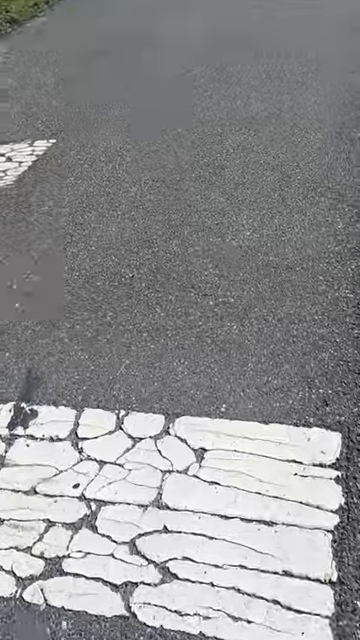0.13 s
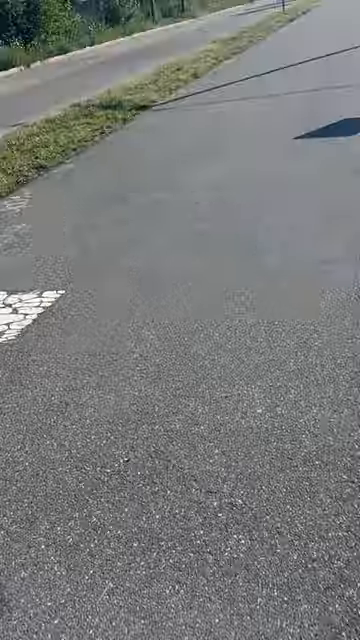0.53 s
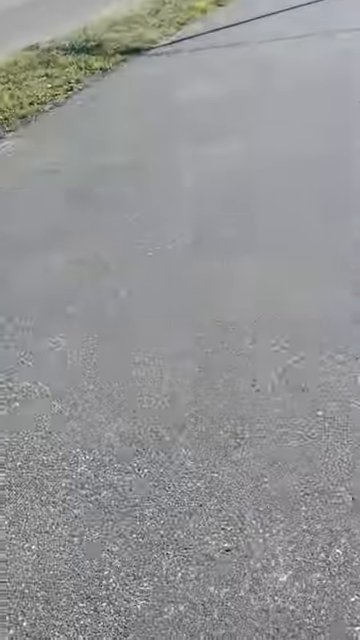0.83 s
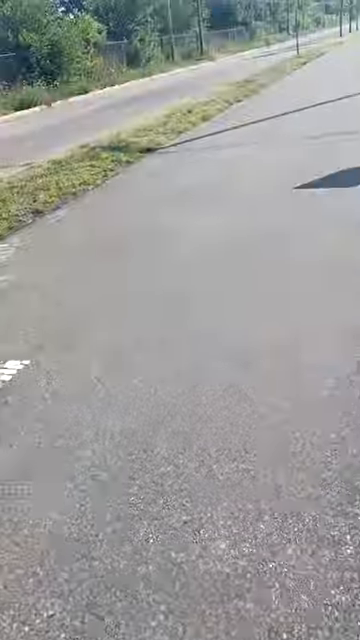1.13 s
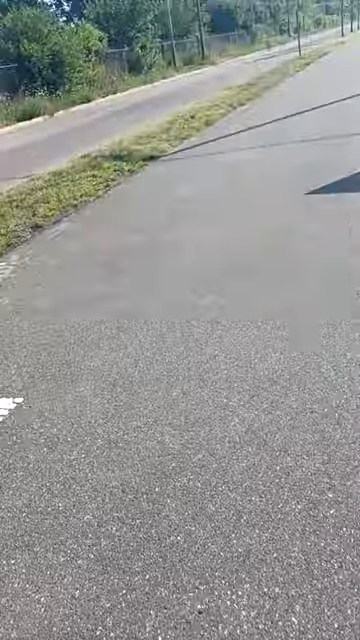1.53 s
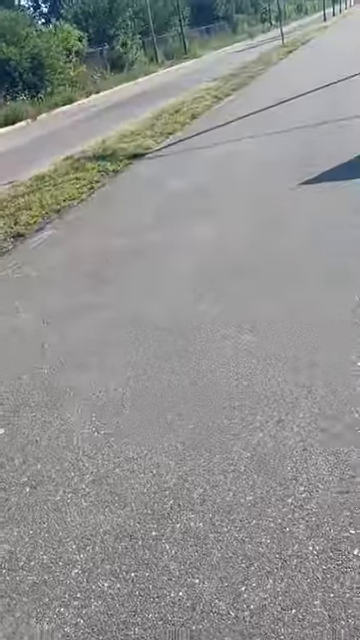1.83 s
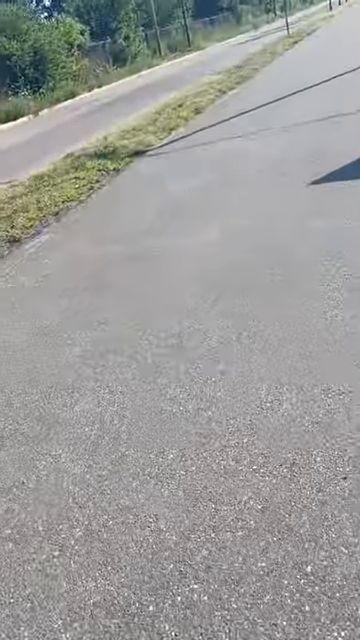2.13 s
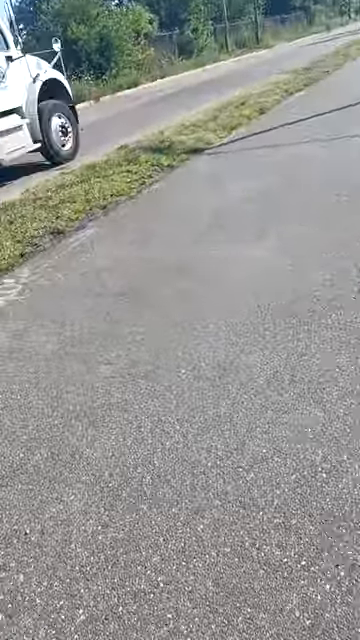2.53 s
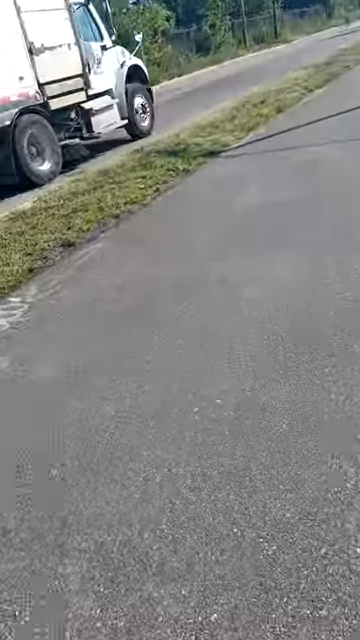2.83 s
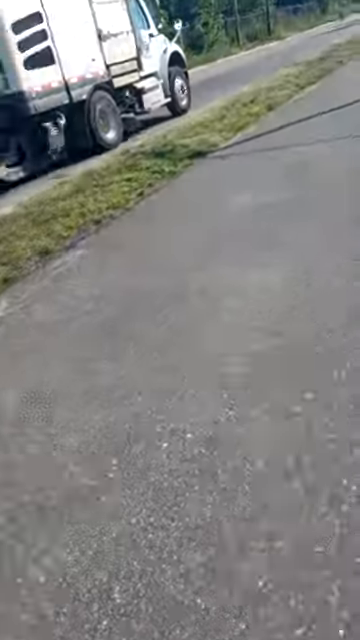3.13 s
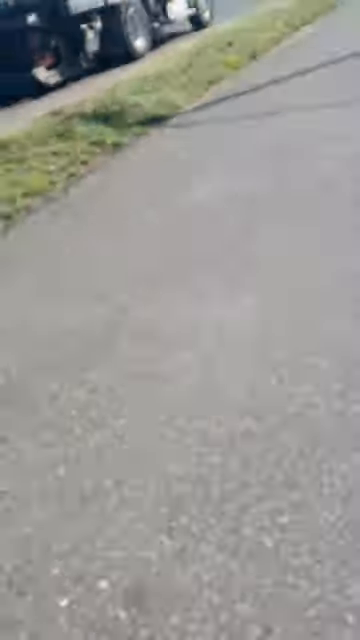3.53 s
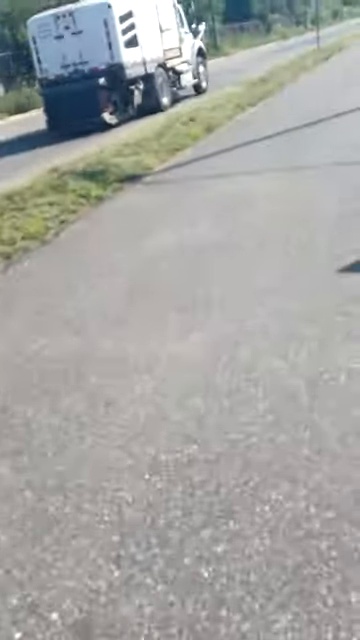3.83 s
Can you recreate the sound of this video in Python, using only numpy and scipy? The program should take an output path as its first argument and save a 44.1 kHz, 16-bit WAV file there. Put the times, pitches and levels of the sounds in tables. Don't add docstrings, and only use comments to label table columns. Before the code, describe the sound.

Loud truck engine growl and broad fan and tyre roar pass from slightly left to right outdoors, with a breathy turbo whine, a knock at three seconds, a faint air puff and a quieter rumbling tail.

```python
import sys
import numpy as np
from scipy import signal
from scipy.fft import rfft, irfft
from scipy.io import wavfile

SR = 44100
rng = np.random.default_rng(int(sys.argv[2]) if len(sys.argv) > 2 else 0)


def field_ratio(decibels):
    return 10 ** (np.asarray(decibels, dtype=float) / 20)


def to_wav(sig):
    pcm = np.clip(np.atleast_2d(sig), -1, 1) * 32767
    pcm = np.round(pcm).astype(np.int16)
    wavfile.write(sys.argv[1], SR, pcm.T)


N = 175959
T = np.arange(N) / SR

# (time [s], roar level [dB], left-right balance [dB], brightness [0-1])
PASS = [(0.2, -23, 1.5, 1), (0.66, -22.5, 1.5, 0.96), (1.84, -21.5, -4.5, 0.44), (1.9, -21.5, -6, 0.82),
        (2.48, -24, -8, 0.61), (2.51, -25.5, -6.5, 0.91), (2.55, -24.5, -8.5, 1), (2.59, -27, -10, 1),
        (2.71, -24.5, -4.5, 0.28), (3.25, -29.5, -7.0, 0.89), (3.9, -31, -4, 1)]


def rms_one(x):
    return x / np.sqrt(np.mean(x ** 2) + 1e-20)


def in_time(rows):
    s, *columns = np.transpose(rows)
    return [np.interp(T, s, column) for column in columns]


def at_hz(points, hz):
    table_hz, value = np.array(points).T
    return np.interp(np.log(hz), np.log(table_hz), value)


def drift(rate_hz):
    hop, settle = 40, 2000
    r = np.exp(-2 * np.pi * hop * rate_hz / SR)
    white = rng.standard_normal(N // hop + settle + 2)
    slow = signal.lfilter([1], [1, -2 * r, r * r], white)[settle:]
    return np.interp(np.arange(N) / hop, np.arange(len(slow)), rms_one(slow))


def swell(at_s, lasts_s):
    return np.exp(-.5 * ((T - at_s) / lasts_s) ** 2)


def bell(x, width):
    return np.exp(-.5 * (x / width) ** 2)


def coloured(x, gain):
    hz = np.maximum(np.fft.rfftfreq(N, 1 / SR), 1)
    return irfft(rfft(x) * gain(hz), N)


def band_pass(x, band_hz):
    return signal.sosfilt(signal.butter(2, band_hz, "band", fs=SR, output="sos"), x)


def ports(shared, own, hz, view):
    # (frequency [Hz], left-right likeness [0-1])
    likeness = [(30, .85), (70, 1), (300, .99), (700, 0.95), (1200, 0.9), (2000, 0.72), (4500, 0.25),
                (12000, .1)]
    # (frequency [Hz], share of the balance [ratio])
    shadow = [(150, 0.12), (300, -0.082), (700, 1.1), (2200, 1.23), (4500, 1.12), (8000, 0.72),
              (13000, -0.25)]
    bass_lag, lag, balance_db = view
    alike = np.clip(at_hz(likeness, hz), 0, 1)
    n = np.arange(N)
    if hz < 400:
        late = np.interp(n - bass_lag, n, shared)
    else:
        late = shared[np.clip(n - np.round(lag).astype(int), 0, N - 1)]
    gain = field_ratio(balance_db * at_hz(shadow, hz) / 2)
    left = np.sqrt(alike) * late + np.sqrt(1 - alike) * own[0]
    right = np.sqrt(alike) * shared + np.sqrt(1 - alike) * own[1]
    return np.array([left * gain, right / gain])


def roar(cycle, view, patchy_db):
    # (time [s], turn [0 front, 1 flank, 2 rear])
    turn_rows = [
        (.15, 0.35),
        (.9, 0.21),
        (1.5, 0.62),
        (2.3, 1.15),
        (2.9, 1.6),
        (3.9, 1.63),
    ]
    # (frequency [Hz], level [dB per Hz])
    front = [(50, -27), (85, -9.5), (250, -12.5), (600, 0), (1100, -11.5), (2300, -12.5), (4700, -26),
             (13500, -37)]
    flank = [(50, -40), (85, -4.5), (230, 0), (600, -9), (1100, -13.5), (1900, -14), (4700, -26.5),
             (13500, -36.5)]
    rear = [(50, -27), (100, -6), (230, -1.5), (600, -7), (1100, -10.5), (2100, -20.5), (4300, -35),
            (13500, -45.5)]
    side_db = [0.2, -1.53, 3]
    # (frequency [Hz], width [octaves], change [dB], time [s],
    # lasts [s])
    band_changes = [(505, 0.15, -5, 0.5, 0.35), (1350, 0.23, -6, 0.93, 0.11), (3400, .3, -4, 1.2, .22),
                    (2150, .3, 3.5, 1.3, .17), (2000, .4, -2.5, 1.7, .1), (88, .2, -4, .9, .9),
                    (570, .2, -3, .7, .2), (3520, 0.35, 2.5, 1.67, 0.17), (288.5, 0.2, 5.5, 2.21, 0.053),
                    (362, .25, 4, 2.38, 0.075), (189, 0.18, -5, 2.33, 0.17), (520, 0.21, -1.5, 2.18, .15),
                    (3860, 0.34, 3.5, 3.68, 0.15), (2920, 0.12, 0, 3.5, 0.25), (65, 0.28, 2.5, 1, 0.79),
                    (67, 0.48, 5, 3.75, 0.43), (246.1, 0.16, 6, 1.0, 0.2), (225, 0.22, 1, 2.04, 0.039),
                    (760, 0.28, 3, 1.62, 0.12), (1560, 0.14, 4, 1.82, 0.26), (396, 0.24, 1, 0.23, 0.11),
                    (330, 0.25, -1.5, 1.1, .35), (2473, 0.08, 0, 1.2, 0.089)]
    clatter_depth, clatter_from_hz = 0.12, 1200

    level_db, _, brightness = in_time(PASS)
    turn = np.clip(in_time(turn_rows)[0], 0, 2)
    together = drift(4.0)
    edges_hz = 32 * 2 ** np.arange(0, 9.1, 1 / 3)
    white = rng.standard_normal((2, 3, N))
    changes = [(mid_hz, width, db * swell(s, lasts)) for mid_hz, width, db, s, lasts in band_changes]
    clatter = 1 + clatter_depth * np.cos(6 * cycle + 4.5 * drift(8.4)) * field_ratio(1.3 * drift(4.2))
    out = 0
    for k, (low, high) in enumerate(zip(edges_hz, edges_hz[1:])):
        shared, *own = band_pass(white[k % 2], [low, high])
        hz = np.sqrt(low * high)
        heard_db = [at_hz(side, hz) + trim_db for side, trim_db in zip((front, flank, rear), side_db)]
        db = np.interp(turn, [0, 1, 2], heard_db)
        db = db + patchy_db * (.5 * together + .5 * drift(2.5) + .9 * drift(14.0))
        db = db + brightness * np.log2(hz / 500) * 0.28
        for mid_hz, width, change_db in changes:
            if .5 < hz / mid_hz < 2:
                db = db + bell(np.log2(hz / mid_hz), width) * change_db
        beat = clatter if hz > clatter_from_hz else 1
        out = out + field_ratio(db) * ports(shared, own, hz, view) * beat
    return field_ratio(level_db + 2.0) * rms_one(out)


def engine(cycle, view):
    # (multiple of the cycle [ratio], level [dB], loudest at [s], lasts [s])
    orders_heard = [(6, -32, 0.5, 0.5), (6, -33, 1.6, 0.42), (38, -32, .58, .22), (36, -35, 1.1, .12),
                    (8, -36.5, .5, 1), (9, -40, 0.31, 0.68), (9, -28.5, 1.12, 0.18), (9, -35, 1.9, 0.23),
                    (12, -34, .4, .5), (12, -34, 1.4, .6), (14, -29, 1.55, .18), (16, -31, 1.6, .07),
                    (14, -33, 1.95, .15), (14, -37, .75, .2), (17, -34, 1.15, .3), (17, -34, 1.9, .25),
                    (18, -36, .3, .3), (18, -29, 2.34, .1), (21, -30.5, .75, .2), (24, -33, .2, .12),
                    (24, -30, .54, .14), (22, -30, 2.2, .05), (25, -32, 2.36, .07), (18, -33, 1.08, .1),
                    (32, -33, 1.1, .07), (38, -34, 1.08, .08), (28, -32, 2.0, .06), (12, -32.5, 3.68, 0.22),
                    (9, -31, 3.97, 0.089), (18, -36.5, 4.27, .3), (10, -39, 3.28, 0.59),
                    (30, -38, 2.32, 0.057), (21, -34, 3.02, 0.23), (42, -30, 1.04, 0.084)]
    wobble_db, wobble_rad = 1.2, .3
    tone = 0
    for order in sorted({round(row[0]) for row in orders_heard}):
        heard = sum(field_ratio(db + 1.5) * swell(s, lasts)
                    for multiple, db, s, lasts in orders_heard if round(multiple) == order)
        level = heard * field_ratio(wobble_db * drift(4.3))
        phase = order * cycle + wobble_rad * drift(3.4) + rng.uniform(0, 2 * np.pi)
        tone = tone + level * np.sin(phase)
    return ports(tone, [tone, tone], 200, view)


def narrow(hz, width_hz):
    r = np.exp(-np.pi * width_hz / SR)
    stage = [1, 0, -1, 1, -2 * r * np.cos(2 * np.pi * hz / SR), r * r]
    return rms_one(signal.sosfilt([stage, stage], rng.standard_normal((3, N))))


def panels(view):
    # (frequency [Hz], width [Hz], level [dB], time [s], lasts [s])
    panel_rows = [(614, 49, -45, 0.37, .3), (811, 29, -33, 0.72, 0.38), (625, 30, -35, 2.4, 0.61),
                  (766, 63, -31, 1.66, 0.091), (427, 43, -38.5, 2.35, 0.47), (1153, 140, -34.5, 2.27, 0.36),
                  (1058, 33, -40, 3.27, 0.46), (2250, 510, -28.5, 0.51, 0.15),
                  (1750, 536, -35.5, 2.03, 0.34), (3800, 1800, -42, 3.315, 0.12),
                  (13200, 450, -57.5, 3.376, 0.45), (2230, 380, -35, 1.25, 0.088),
                  (1090, 89, -31.5, 0.49, 0.28)]
    out = 0
    for hz, width_hz, db, s, lasts in panel_rows:
        shared, *own = narrow(hz, width_hz) * field_ratio(db) * swell(s, lasts)
        out = out + ports(shared, own, hz, view)
    return out


def slow_noise(width_hz):
    white = rng.standard_normal((2, 3, N))
    return rms_one(signal.lfilter(*signal.butter(2, width_hz / 2, fs=SR), white))


def turbo(view):
    # (time [s], frequency [Hz], level [dB], breathiness [0-1])
    whine = [(.15, 4800, -44, .9), (.5, 4780, -43.5, .9), (1.32, 4780, -42, .9), (1.45, 4560, -43.5, .9),
             (1.9, 4560, -43, .8), (2.15, 4420, -46, .6), (2.3, 4385, -43.5, .3), (2.52, 4345, -43.5, .25),
             (2.555, 4345, -54, .25), (2.59, 4345, -43.5, .25), (2.7, 4335, -46.5, .3),
             (2.77, 4325, -66, .3)]
    width_hz, core_hz, throb_db = 360, 75, 2.8
    whistle_hz, whistle_db, whistle_s, whistle_lasts_s = 8164, -54, 2.02, .13

    hz, db, breath = in_time(whine)
    breath = np.clip(breath, 0, 1)
    carrier = np.exp(2j * np.pi * np.cumsum(hz) / SR)
    wide, core = slow_noise(width_hz), slow_noise(core_hz)
    slow = np.sqrt(breath) * wide + np.sqrt(1 - breath) * core
    hiss = slow[0] * carrier.real + slow[1] * carrier.imag
    hiss = hiss * field_ratio(db + throb_db * breath * drift(9.3))
    whistle = np.sin(2 * np.pi * whistle_hz * T + .6 * drift(15.0))
    whistle = whistle * field_ratio(whistle_db) * swell(whistle_s, whistle_lasts_s)
    return ports(hiss[0], hiss[1:], 3900, view) + whistle


def knocks(view):
    # (time [s], dull level [dB], clack level [dB], bright level [dB])
    knock_rows = [
        (3.0255, -8.5, -38, -44),
        (3.034, -11.5, -30, -45),
        (3.056, -27, -45, -33),
        (3.066, -30, -45, -38),
        (3.293, -32, -44, -36),
        (3.632, -19, -41, -45),
    ]
    # (frequency [Hz], level [dB], T60 [s])
    dull_modes = [(840, -5, .04), (1030, -1, .045), (1190, 0, .04), (1460, -1, .035), (600, -9, .04)]
    attack_s, bright_t60_s = .002, .06
    bump_s, bump_db, bump_hz, bump_lasts_s = 3.958, -18, 165, .003

    dull = np.zeros(N)
    rattle = np.zeros((2, 1, N))
    chance_db = rng.normal(0, 1.9, (len(knock_rows), len(dull_modes)))
    for row_db, (s, dull_db, *sharp_db) in zip(chance_db, knock_rows):
        age = np.maximum(T - s, 0)
        on = (T > s) * np.minimum(age / attack_s, 1)
        rattle += on * field_ratio(np.reshape(sharp_db, (2, 1, 1)) - 60 * age / bright_t60_s)
        for vary_db, (hz, db, t60) in zip(row_db, dull_modes):
            decay = field_ratio(dull_db + db + vary_db - 9 - 60 * age / t60)
            dull += on * decay * np.sin(2 * np.pi * hz * age)
    thud = np.cos(2 * np.pi * bump_hz * (T - bump_s))
    dull -= field_ratio(bump_db) * swell(bump_s, bump_lasts_s) * thud

    white = rng.standard_normal((3, N))
    clack = rattle[0] * rms_one(band_pass(white, (1400, 3500)))
    bright = rattle[1] * rms_one(band_pass(white, (3500, 6000)))
    out = ports(dull, [dull, dull], 409.9, view)
    out = out + ports(clack[0], clack[1:], 1500, view)
    return out + ports(bright[0], bright[1:], 3600, view)


def puff():
    # (frequency [Hz], level [dB per Hz])
    puff_colour = [(2500, -8), (4200, -2), (6000, -6), (9000, -4), (13000, 0), (15500, -3)]
    at_s, lasts_s, level_db, low_hz, pan_db = 3.262, .03, -46, 2500, -12
    white = rng.standard_normal((2, N))
    air = rms_one(coloured(white, lambda hz: field_ratio(at_hz(puff_colour, hz)) * (hz > low_hz)))
    return air * field_ratio(level_db + pan_db * np.array([[.5], [-.5]])) * swell(at_s, lasts_s)


def scene():
    # (time [s], firing rate [Hz])
    firing = [(.15, 85.2), (.6, 89.87), (.8, 88.77), (1.1, 82.84), (1.6, 89.1), (1.95, 88.07), (2.2, 79.93),
              (2.45, 76.5), (2.8, 70.85), (3.4, 71.75), (3.95, 75.3)]
    # (time [s], bass lag [samples], lag above [samples])
    lag_rows = [(.15, 7.5, 10.5), (1.2, 6.5, 5), (2.0, 6, 1), (2.7, 2, -9), (3.9, 1, -12)]
    cycle = 2 * np.pi * np.cumsum(in_time(firing)[0]) / 6 / SR
    view = in_time(lag_rows) + [in_time(PASS)[1]]
    out = roar(cycle, view, patchy_db=0.84) + engine(cycle, view) + panels(view)
    return out + turbo(view) + knocks(view) + puff()


def low_pass(x):
    return signal.sosfilt(signal.butter(12, 15790, fs=SR, output="sos"), x)


def record(dry):
    # (frequency [Hz], width [Hz], left [dB], right [dB])
    housing = [(516, 24, -4, -1), (1200, 54, 5.5, -1.5), (1414, 188, -2, -7), (2050, 680, -3.5, 4),
               (2340, 490, 5, -2.5), (2856, 390, -2.5, -5), (7000, 550, 5.5, -9), (7740, 310, -6, -0.5),
               (8340, 280, 0.5, -10), (8830, 1490, -6.5, -12.5)]
    cutoff_hz, rumble_cut_hz = 15780, 21.7
    start_s, opens_s, settle_db, settle_s = .1156, .0002, 3, .02

    def housing_gain(hz):
        db = sum(np.array([[left_db], [right_db]]) * bell(hz - mid_hz, width)
                 for mid_hz, width, left_db, right_db in housing)
        return field_ratio(db) * (hz < cutoff_hz)

    x = coloured(dry, housing_gain)
    x = signal.sosfilt(signal.butter(2, rumble_cut_hz, "high", fs=SR, output="sos"), x)
    x = x * field_ratio(settle_db * np.exp(-np.abs(T - start_s) / settle_s))
    x = x * np.clip((T - start_s) / opens_s, 0, 1)
    return low_pass(x)


dry = scene()
out = record(dry)
to_wav(out)
```